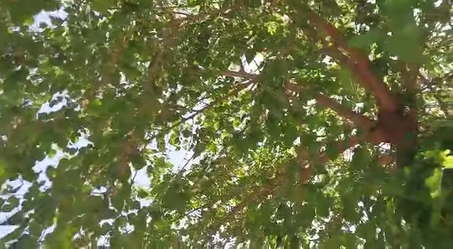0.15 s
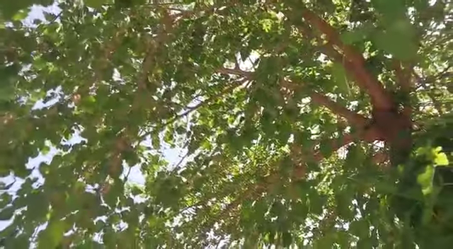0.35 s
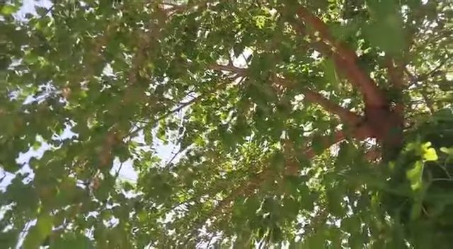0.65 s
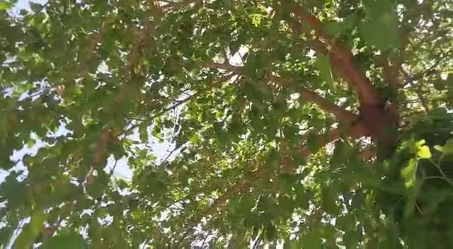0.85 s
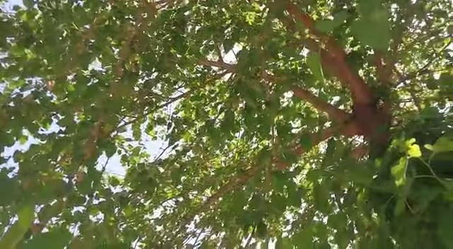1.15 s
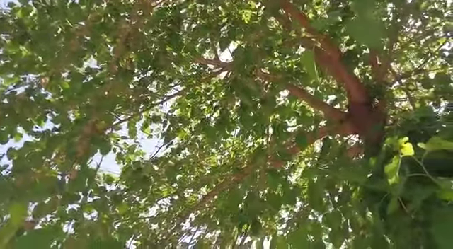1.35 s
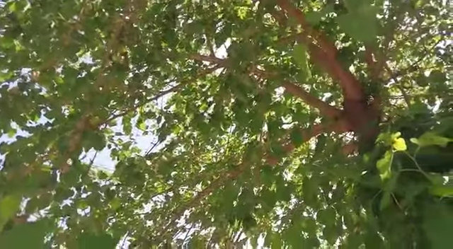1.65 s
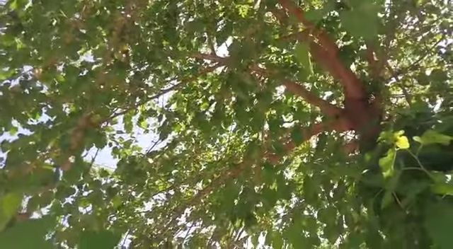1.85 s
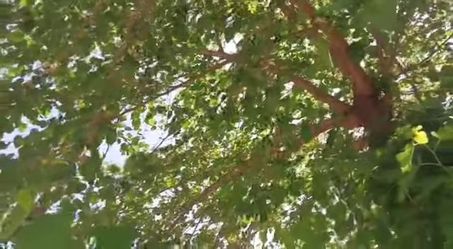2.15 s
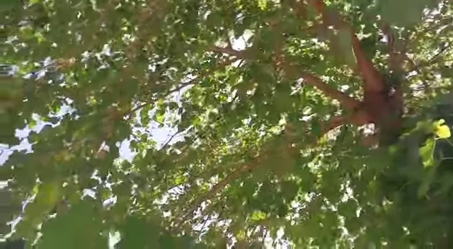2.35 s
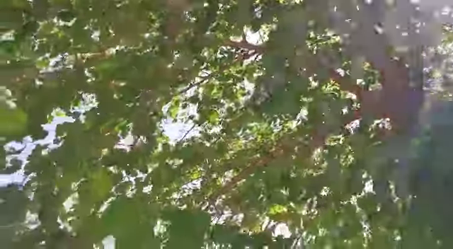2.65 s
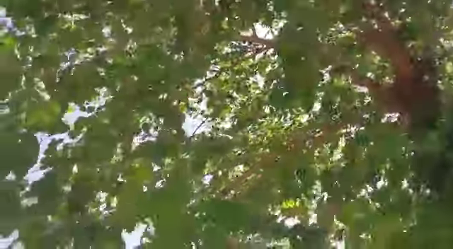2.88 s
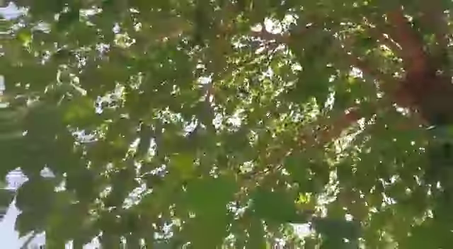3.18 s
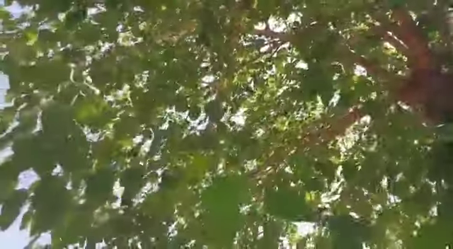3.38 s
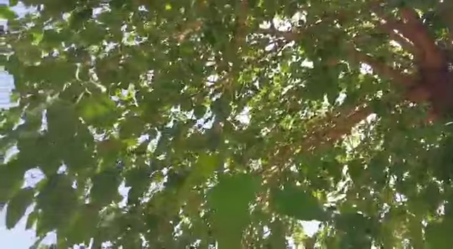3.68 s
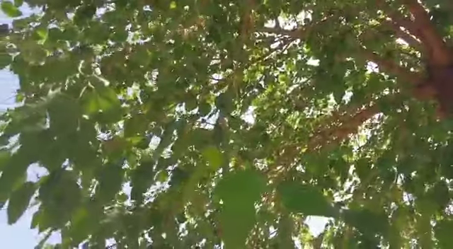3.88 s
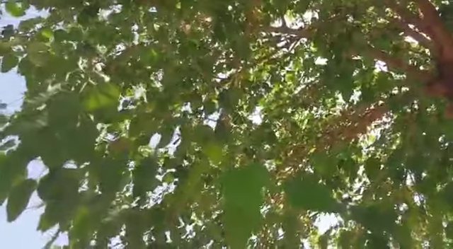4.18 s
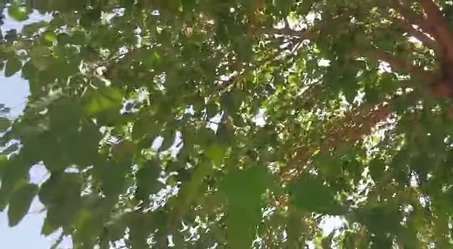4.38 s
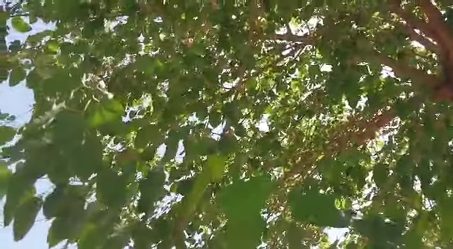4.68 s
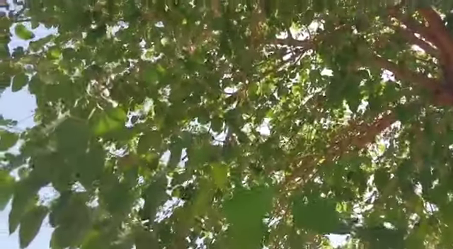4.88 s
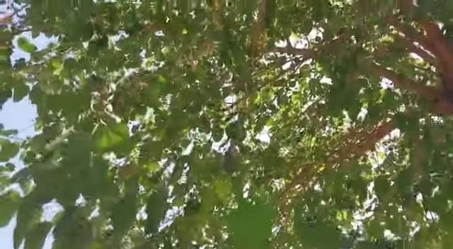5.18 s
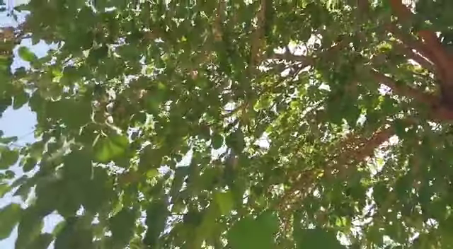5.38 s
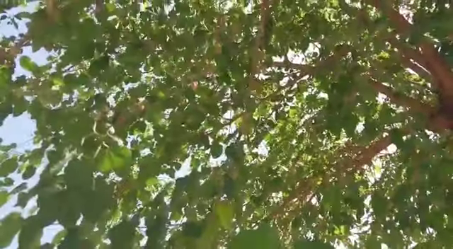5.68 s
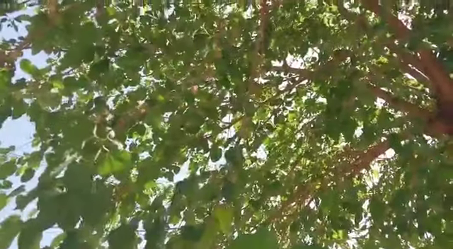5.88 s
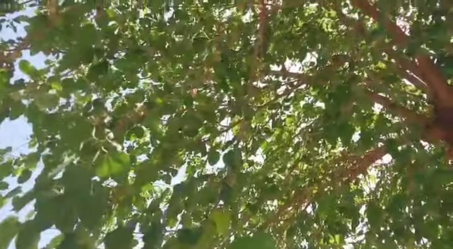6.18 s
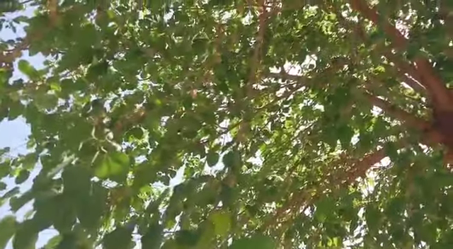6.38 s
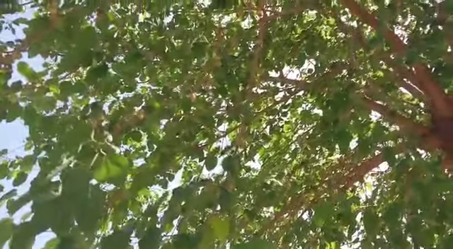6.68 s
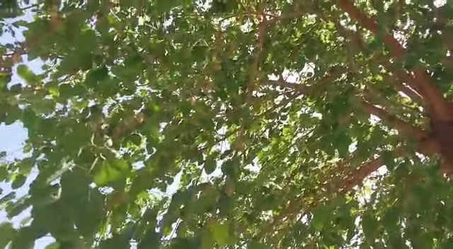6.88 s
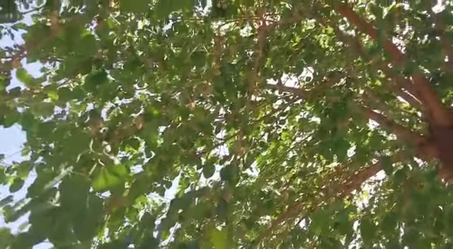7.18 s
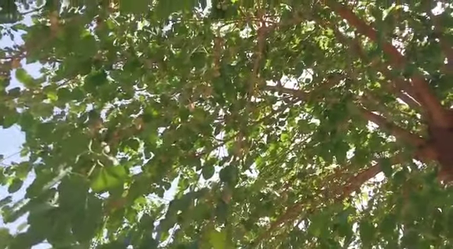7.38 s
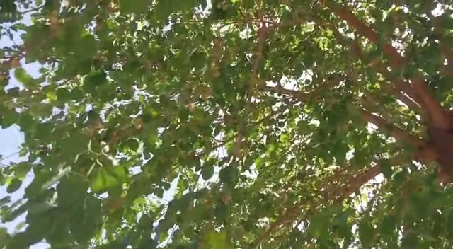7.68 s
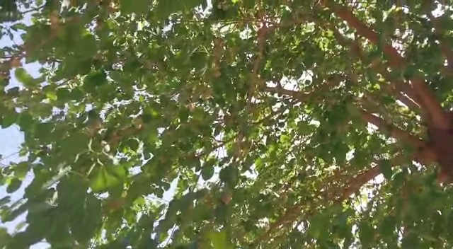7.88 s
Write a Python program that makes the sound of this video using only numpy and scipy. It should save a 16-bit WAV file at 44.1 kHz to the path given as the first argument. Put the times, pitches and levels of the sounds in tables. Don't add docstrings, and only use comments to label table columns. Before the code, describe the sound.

A leafy tree outdoors, with a quiet, low traffic rumble and faint tyre hiss beneath it. A hidden bird's muffled chirp opens at 0 s, then a loud, crisp two-part sparrow chirrup at 0.6 s. Quick cheeps and chips follow at 1.0, 1.3, 1.4 and 1.9 s, with a rapid slurred pair at 1.6-1.7 s. Higher chirps come at 2.2 and 3.4 s, a soft chip at 2.5 s, a softer chirrup at 3.6 s and a clear cheep at 3.9 s. The loudest chirrup rings at 4.8 s. A barely audible thin insect note pulses around 4.4-5.8 s. Farther calls sound at 5.3, 5.8 and 6.4 s, a double chirp near 6.8 s, a cheep at 7.1 s and a final chirrup at 7.8 s. Tiny high seeps and blurred flock chatter fill gaps. Calls glide around 2.5-5 kHz, with short diffuse echoes and brittle treble sheen.

```python
import sys
import numpy as np
from scipy import signal
from scipy.fft import rfft, irfft, next_fast_len
from scipy.io import wavfile
from scipy.ndimage import uniform_filter1d

SR = 44100
rng = np.random.default_rng(int(sys.argv[2]) if len(sys.argv) > 2 else 0)


def amplitude_ratio(level_db):
    exponent = np.asarray(level_db, float) / 20
    return 10 ** exponent


def bounce(signal):
    frames = np.transpose(np.atleast_2d(signal))
    limited = np.clip(frames, -1, 1)
    pcm = np.round(limited * 32767).astype(np.int16)
    wavfile.write(sys.argv[1], SR, pcm)


N = 355005

# t [ms], f [Hz], level [dB]
CHEEP_SHAPE = [(0, 3300, -9), (8, 4250, -1), (14, 4450, 1), (24, 3520, 3), (32, 4100, 1), (38.5, 3050, -5),
               (55, 2900, -5), (74, 2600, -12)]
CHIP_SHAPE = [(0, 3200, -15), (8, 4500, -2), (18, 4950, 0), (25, 3700, -5), (34, 3200, -9), (40, 2720, -14),
              (55, 2680, -11), (70, 2550, -20)]
CHILP_SHAPE = [(0, 2900, -14), (8, 4100, -5), (17, 4500, -1), (26, 3500, -2), (36, 3200, -1),
               (45, 2750, -17), (60, 3420, 0), (68, 2900, -6), (78, 2350, -11)]
WHISTLE_SHAPE = [(0, 1850, -18), (40, 2950, -11), (52, 3600, -20), (65, 2700, -4), (96, 2410, 0),
                 (117, 2200, -4), (130, 1950, -13)]
SEEP_SHAPE = [(0, 5900, -8), (10, 6500, 0), (30, 6500, 0), (45, 5900, -8)]
# t/ms, f/Hz, level/dB
CHIR_SHAPE = [(0, 2900, -22), (7, 4200, -12), (19, 4900, -1), (28, 3450, -7), (39, 3750, -0.5),
              (47, 3200, -9), (54, 3900, -1), (61, 3820, -3), (66, 2850, -15)]
RUP_SHAPE = [(63, 2850, -17), (73, 2950, -12), (83, 3480, -2), (95, 3980, -1.5), (104, 2900, -9),
             (112, 3400, -6), (128, 2350, -14)]
HIGH_CHIR_SHAPE = [(0, 4000, -15), (9, 5500, -5), (17, 5600, 0), (25, 4000, -9), (35, 4150, -3),
                   (44, 4500, -2), (55.5, 3450, -16)]
HIGH_RUP_SHAPE = [(53, 3400, -15), (68, 3950, 0), (76, 4050, -3), (83, 4900, -7), (95, 3000, -9),
                  (103, 3500, -7), (112, 2650, -12)]
# t/ms, f/Hz, level/dB
LONG_UPBEAT = [(-40, 4200, -34), (-22, 4500, -22), (-8, 5150, -14), (2, 5600, -20)]
SHORT_UPBEAT = [(-31, 4300, -36), (-5.5, 4900, -6.5), (-1.5, 5350, -14), (0, 7350, -12.5)]
# t/ms, f/Hz, level/dB
CAP_SHAPE = [(6, 4500, -22), (10, 4900, -7), (18, 4900, -8), (24, 4800, -17), (33, 4850, -13),
             (42, 4800, -30)]

# t/s, level/dB, pitch/factor, length/factor, left minus right/dB
CHIRRUP_CALLS = [
    (.583, -26.5, 1.01, .98, 2.8),
    (3.557, -29.5, 1., .98, -1),
    (4.783, -25.5, .99, .99, .3),
    (7.829, -28.5, 1.02, .98, -2),
]
HIGH_CHIRRUP_CALLS = [
    (1.005, -41, 0.98, 1.04, 1.3),
    (2.19, -36, 1.01, 1.01, 1.3),
    (3.412, -41.5, .99, 1.01, 1.7),
]
CHEEP_CALLS = [
    (1.280, -34, 1.05, 0.87, 1.5),
    (1.863, -30.5, 1.05, 1, -2),
    (1.888, -54, 0.89, 0.84, 2),
    (4.0, -57, .865, .77, 1.5),
    (7.95, -50, 1.19, 0.95, .5),
]
CHIP_CALLS = [
    (1.384, -34, .984, .99, -0.67),
    (2.497, -36, 0.98, 1, -.3),
]
CHILP_CALLS = [
    (6.752, -33.5, 1.026, 1., 0.024),
    (6.844, -31.5, .98, 0.97, 0),
]
WHISTLE_CALLS = [
    (2.345, -49, .99, 1., -1),
    (4.567, -52, 1., 1., -1),
    (7.413, -56, 1, 1., -1),
]
SEEP_CALLS = [
    (.07, -56, 1.02, 0.66, 0),
    (.455, -54, .99, 1., 0),
    (2.935, -62, 1.01, 1., 0),
    (3.775, -63, 1., 0.87, 0),
    (4.235, -57, .99, 0.88, 0),
    (4.665, -58.5, 1.04, 0.8, 0),
    (5.805, -65, .904, .93, 0.0063),
    (6.92, -55, 0.92, 0.85, 0),
]
SLUR_CALLS = [
    (1.599, -31, 1., 1.03, 0.83),
    (1.694, -31, 0.99, 0.93, .4),
]
CLOSE_CHEEP_CALLS = [
    (1.192, -49, 1.04, 1.15, 0),
    (2.820, -38, 1.04, 1., 1.5),
    (3.891, -34.5, 1.01, .98, 3),
    (7.066, -35.5, 1.02, .99, -2.5),
]
FAR_CHIRRUP_CALLS = [
    (-.035, -38.5, .95, 1.25, 2),
    (5.297, -43.5, 0.98, 1.03, 1.5),
    (5.755, -40.5, .88, 0.87, 0.5),
    (6.421, -47.5, .9, 1.03, 5),
]
FAR_CHEEP_CALLS = [(.085, -49.5, .95, 1., 3), (.19, -53.5, 1.03, 1.4, 2), (2.608, -43.5, 1., 1., 1),
                   (3.07, -56.5, 1.216, 1.785, 0), (3.78, -57.5, 1.2, 1.55, 3), (4.33, -69, 1.37, 1., -7),
                   (4.53, -56.5, 1.02, 1.5, 3), (4.585, -54, 1., 1.2, -1), (5.06, -55, 1.13, 1.3, 4),
                   (5.46, -59.5, 0.78, 1.3, -2), (5.72, -53.5, 1.2, 1.5, 3), (5.865, -49, .86, 0.72, 2),
                   (6.255, -59.5, 1.007, 2.1, 4), (7.34, -59, 0.98, 2.34, 3.5),
                   (7.48, -56, 1.12, 1.74, 7.5)]

# t/s, level/dB
FLOCK_OUTBURSTS = [(.15, -51.5), (.3, -60.5), (.69, -52.5), (1.23, -49), (1.66, -53), (1.85, -51),
                   (1.99, -53.5), (2.598, -51), (2.89, -51), (3.18, -61), (3.59, -46.5), (4.03, -58),
                   (4.85, -44.5), (4.97, -59), (5.31, -60), (5.92, -58), (6.46, -56.5), (6.67, -58.5),
                   (7.038, -56), (7.46, -59.5), (8.05, -48)]
# t/s, f/Hz, level/dB, octave level/dB
INSECT_NOTE = [(4.43, 3470, -56, -25), (4.5, 3410, -69.5, -13), (4.9, 3430, -63, -12),
               (5.2, 3420, -65, -20), (5.75, 3420, -73.5, -33.5), (5.85, 3400, -89, -32)]
# f/Hz, level per
# Hz/dB
TOWN_COLOUR = [(25, 0), (86, 1), (179, 2), (351, -10), (620, -9), (850, -24.5), (1150, -27.5),
               (1590, -23.5),
               (2320, -34.5), (3870, -19), (4670, -23.5), (8240, -55), (11100, -44), (15700, -53)]
# f/Hz, side minus mid/dB
TOWN_WIDTH = [(40, -13.5), (150, -13), (350, -5), (700, 0), (1500, -0.5), (8000, -2)]
# f/Hz, left minus right/dB
TOWN_BALANCE = [(40, -2.3), (150, -1), (350, -3.5), (700, -4), (1500, -6.5), (8000, 5)]
# t/s, level change/dB
TRAFFIC_SWELL = [(0, 1.5), (.4, -0.5), (1.8, 0), (2.05, 3.5), (2.7, .4), (3.1, -0.5), (3.8, 0.45),
                 (5.6, 0.1), (7.3, -2.5), (8.05, 0.5)]
# t/s, level change/dB
TYRE_SWELL = [(0, 1), (1.9, 3), (3.2, -1), (5.2, -3), (6.7, -2.5), (6.95, 3), (7.8, -3.5)]
TYRE_BANDS = (10, 11)
# low f/Hz, high f/Hz, level/dB
SHEEN_BANDS = [(8860, 10000, -43.5), (10150, 11500, -38.5), (11490, 13000, -37), (13000, 14500, -40.5),
               (14750, 17230, -40.5)]


def sparrows():
    # (shape, pitch ratio, level/dB)
    long = [(LONG_UPBEAT, 1, 0), (LONG_UPBEAT, 1.19, -8), (LONG_UPBEAT, .5, -19), (CAP_SHAPE, 1, -6)]
    short = [(SHORT_UPBEAT, 1, -3.0), (SHORT_UPBEAT, 1.15, -7)]
    capped = short + [(CAP_SHAPE, 1, 0)]
    chirrup = [(CHIR_SHAPE, 1, 0), (RUP_SHAPE, 1, 0)] + long
    high = [(HIGH_CHIR_SHAPE, 1, 0), (HIGH_RUP_SHAPE, 1, 0), (SHORT_UPBEAT, 1.18, -3.1)]
    cheep = [(CHEEP_SHAPE, 1, 0)] + capped
    chip = [(CHIP_SHAPE, 1, 0)] + capped
    chilp = [(CHILP_SHAPE, 1, 0), (SHORT_UPBEAT, 1.1, -9)]
    whistle = [(WHISTLE_SHAPE, 1, 0)]
    seep = [(SEEP_SHAPE, 1, 0), (SEEP_SHAPE, .92, -2)]
    slur = [(CHILP_SHAPE, 1, 0)] + short
    return sum([
        bird(CHIRRUP_CALLS, chirrup, leaves_db=-5, lag=-8),
        bird(HIGH_CHIRRUP_CALLS, high, hidden_db=1.5, lag=3),
        bird(FAR_CHIRRUP_CALLS, high, hidden_db=17),
        bird(CHEEP_CALLS, cheep, hidden_db=7.5, lag=4),
        bird(CLOSE_CHEEP_CALLS, cheep, hidden_db=2.8),
        bird(FAR_CHEEP_CALLS, cheep, hidden_db=14),
        bird(CHIP_CALLS, chip, lag=0),
        bird(CHILP_CALLS, chilp, leaves_db=-2.0),
        bird(WHISTLE_CALLS, whistle, hidden_db=2.4, leaves_db=-8.0, throat_hz=1540),
        bird(SEEP_CALLS, seep, hidden_db=6.5, leaves_db=-6),
        bird(SLUR_CALLS, slur, hidden_db=2.2, lag=9),
    ])


def bird(calls, voices, hidden_db=0, leaves_db=-4.0, leaves_t60=.09, throat_hz=2200, lag=1):
    out = np.zeros((3, N))
    turn_s = 2.4
    lead_in = SR // 10
    for s, db, pitch, length, pan_db in calls:
        call = np.zeros((1, SR // 5 * 2))
        for shape, ratio, voice_db in voices:
            lead, x = note(shape, pitch * ratio, length)
            add(call, lead_in + lead, x[None] * amplitude_ratio(db + 1.5 + voice_db))
        call = band(call, throat_hz, 12000)
        right = np.roll(call, lag if s < turn_s else 1)
        direct = amplitude_ratio(-hidden_db) * np.vstack([call, right])
        leaves = amplitude_ratio(leaves_db) * echoes(call[0], leaves_t60, 6.2, 7800)
        near = (direct + leaves) * amplitude_ratio(np.array([[pan_db], [-pan_db]]) / 2)
        add(out, int(s * SR) - lead_in, np.vstack([near, call]))
    return out


def note(shape, pitch, length, octave_db=-31, wobble=.012, rough_db=2.5, rasp_db=-20):
    ms, hz, db = np.transpose(shape)
    t = np.arange(ms[0], ms[-1], 1000 / SR / length)
    unsure = np.where(t < 0, 3, 1)
    glide = uniform_filter1d(np.interp(t, ms, hz), size=44) * pitch
    glide = glide * (1 + wobble * unsure * walk(400, len(t)))
    phase = 2 * np.pi * np.cumsum(glide) / SR
    edge = np.minimum(1, np.minimum(t - ms[0], ms[-1] - t) / 2.5)
    gain = edge * amplitude_ratio(np.interp(t, ms, db) + rough_db * walk(244, len(t)))
    rasp = 1 + amplitude_ratio(rasp_db) * walk(2500, len(t))
    tone = rasp * np.sin(phase) + amplitude_ratio(octave_db) * np.sin(2 * phase)
    return int(ms[0] * length * SR / 1000), gain * tone


def echoes(x, t60, gap_ms, top_hz):
    t = np.arange(min(len(x), SR) // 2) / SR
    fade = np.exp(-np.log(1000) * t / t60)
    build_up = np.minimum(1, t * 1000 / gap_ms)
    tail = rng.standard_normal((2, len(t))) * fade * build_up
    tail = tail / np.sqrt(np.sum(tail ** 2) / 2)
    tail = signal.lfilter(*signal.butter(2, top_hz, fs=SR), tail)
    return signal.fftconvolve(x[None], tail, axes=1)[:, :len(x)]


def flock(count=300):
    out, t = np.zeros((1, N)), np.arange(N) / SR
    for when, pitch, size, kind in rng.random((count, 4)):
        shape = [CHEEP_SHAPE, CHILP_SHAPE, HIGH_CHIR_SHAPE][int(3 * kind)]
        lead, x = note(shape, .92 + .2 * pitch, 0.92)
        add(out, int(when * N), x[None] * amplitude_ratio(1.5 * size))
    rise_db_s, fall_db_s = 140, 84
    power = np.zeros(N)
    for s, db in FLOCK_OUTBURSTS:
        below_peak_db = np.maximum((s - t) * rise_db_s, (t - s) * fall_db_s)
        power += amplitude_ratio(db - below_peak_db) ** 2
    return unit(echoes(out[0], 0.25, 25, 7700)) * np.sqrt(power)


def insect():
    hz, db, octave_db = curve(INSECT_NOTE)
    phase = 2 * np.pi * np.cumsum(hz * (1 + 0.00396 * walk(60, N))) / SR
    pulsing = amplitude_ratio(db + 4 * walk(30, N))
    corners_s = [INSECT_NOTE[i][0] for i in (0, 1, -2, -1)]
    sounding = np.interp(np.arange(N) / SR, corners_s, [0, 1, 1, 0])
    return sounding * pulsing * (np.sin(phase) + amplitude_ratio(octave_db) * np.sin(2 * phase))


def town(calls):
    size = next_fast_len(N)
    hz = np.fft.rfftfreq(size, 1 / SR)
    colour = amplitude_ratio(on_log(TOWN_COLOUR, hz)) / (1 + (38 / (hz + 1)) ** 6)
    mid, side = rfft(rng.standard_normal((2, size))) * colour
    side = (side + .6j * mid) * amplitude_ratio(on_log(TOWN_WIDTH, hz))
    lean = amplitude_ratio(on_log(TOWN_BALANCE, hz) / 2)
    both = np.array([(mid + side) * lean, (mid - side) / lean])
    lift_db = 7.5 * share(calls, -31, 0.076) + curve(TRAFFIC_SWELL)[0]
    tyres_db = curve(TYRE_SWELL)[0]
    octave, gust = np.log2(hz + 1), walk(4.6, N)
    out = np.zeros((2, N))
    for k in range(4, 15):
        part = irfft(both * np.clip(1 - abs(octave - k), 0, 1), size)[:, :N]
        swell_db = tyres_db if k in TYRE_BANDS else lift_db
        out += part * amplitude_ratio(.7 * gust + 1.28 * walk(6, N) + swell_db)
    return unit(out) * amplitude_ratio(-54)


def patchy_hiss():
    noise = rng.standard_normal((3, N))
    noise = noise[:2] + 0.12 * noise[2]
    out = np.zeros((2, N))
    for lo_hz, hi_hz, db in SHEEN_BANDS:
        out += amplitude_ratio(db + 4.1 * walk(45, N)) * unit(band(noise, lo_hz, hi_hz))
    return out


def unit(x):
    return x / np.sqrt(np.mean(x ** 2))


def curve(table):
    s, *columns = np.transpose(table)
    return [np.interp(np.arange(N) / SR, s, c) for c in columns]


def on_log(table, hz):
    table_hz, values = np.transpose(table)
    return np.interp(np.log(hz + 1), np.log(table_hz), values)


def walk(rate, size):
    k = max(int(SR / rate), 1)
    steps = np.repeat(rng.standard_normal(int(size // k) + 1), k)
    return 1.4 * uniform_filter1d(steps, k)[:size]


def band(x, lo_hz, hi_hz):
    return signal.sosfilt(signal.butter(4, [lo_hz, hi_hz], "band", fs=SR, output="sos"), x)


def add(out, start, x):
    a, b = np.clip([start, start + x.shape[-1]], 0, N)
    out[:, a:b] += x[:, a - start:][:, :b - a]


def share(x, knee_db, span_s):
    level = np.sqrt(np.maximum(uniform_filter1d(x ** 2, int(span_s * SR)), 0))
    return level / (level + amplitude_ratio(knee_db))


def scene():
    left, right, send = sparrows()
    walls = amplitude_ratio(-13.5) * echoes(send, 0.4, 26, 9200)
    return np.array([left, right]) + walls + flock() + insect() + town(send)


def top_cut(x):
    return signal.sosfilt(signal.butter(12, 15880, fs=SR, output="sos"), x)


def record(dry):
    t = np.arange(N) / SR
    birds = signal.hilbert(band(dry, 2300, 5600), next_fast_len(N))[:, :N]
    level = np.sqrt(np.maximum(uniform_filter1d(abs(birds) ** 2, size=1024), 0))
    copies = np.zeros((2, N))
    for shift_hz, db in [(7450, -23.5), (11150, -25.0)]:
        copies += amplitude_ratio(db) * np.real(birds * np.exp(2j * np.pi * shift_hz * t))
    sheen = copies * level / (level + amplitude_ratio(-25.0)) + level * patchy_hiss()
    sheen_db = -3.5 + 14.5 * share(level, -28.5, 0.2)
    sheen = sheen * amplitude_ratio(sheen_db + np.array([[-2.0], [2.0]]))
    haze = level * amplitude_ratio(-30.5) * unit(band(rng.standard_normal((2, N)), 6020, 7580))
    treble_cut = signal.ellip(8, .1, 60, 15800, fs=SR, output="sos")
    mix = signal.sosfilt(treble_cut, dry + sheen + haze)
    return top_cut(mix)


dry = scene()
out = record(dry)
bounce(out)
```